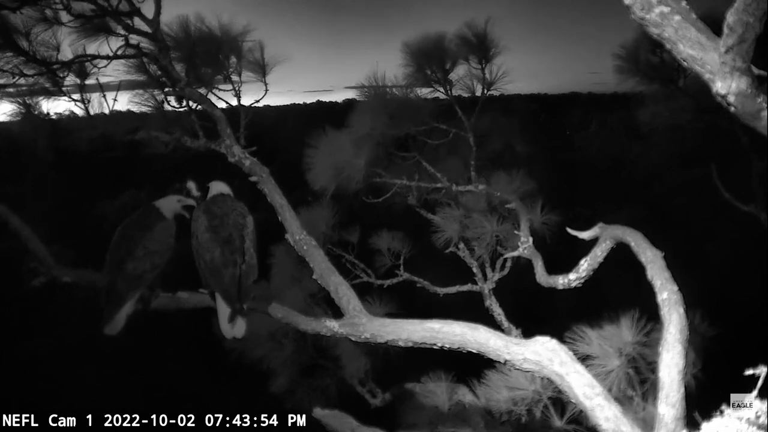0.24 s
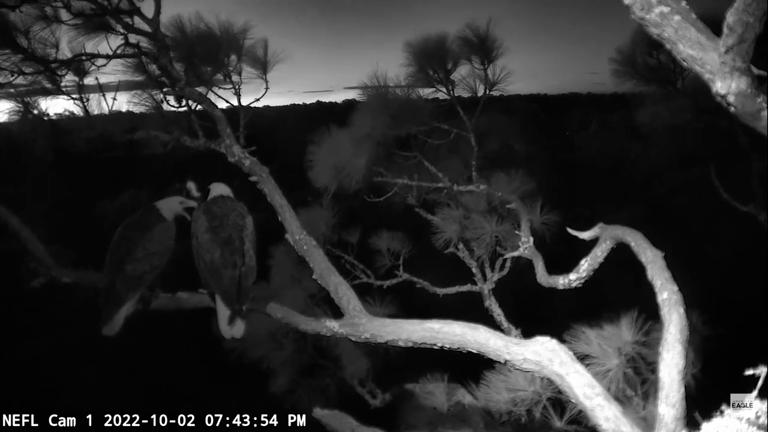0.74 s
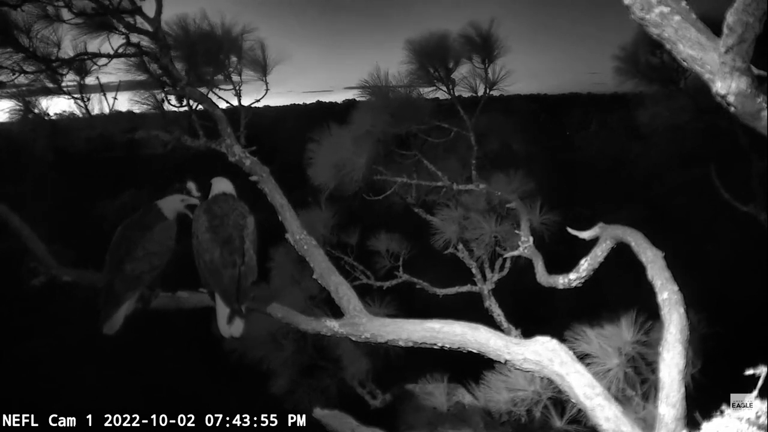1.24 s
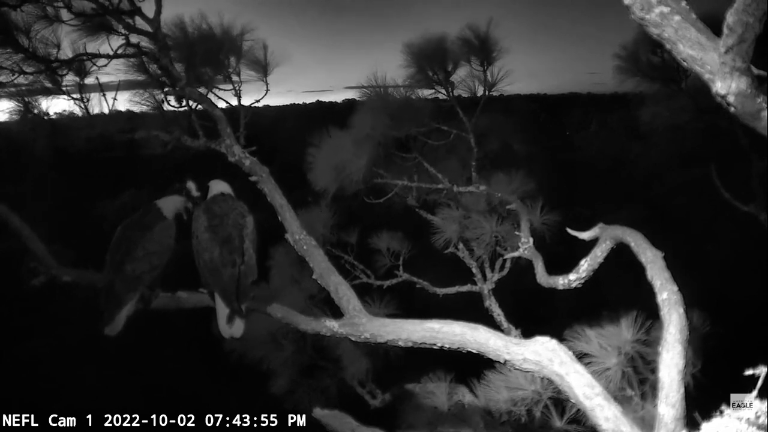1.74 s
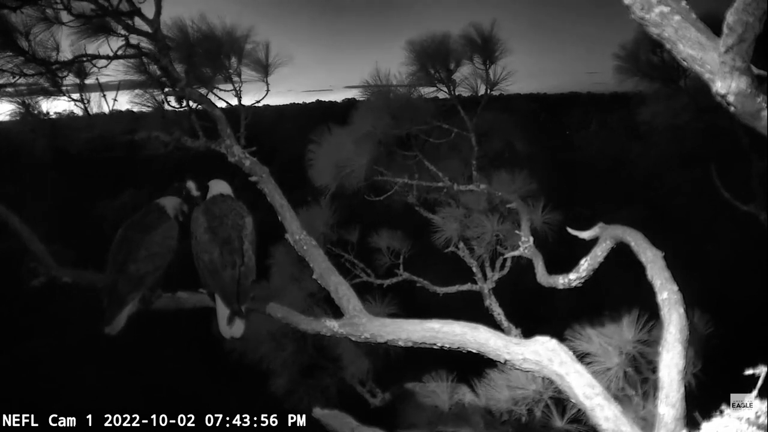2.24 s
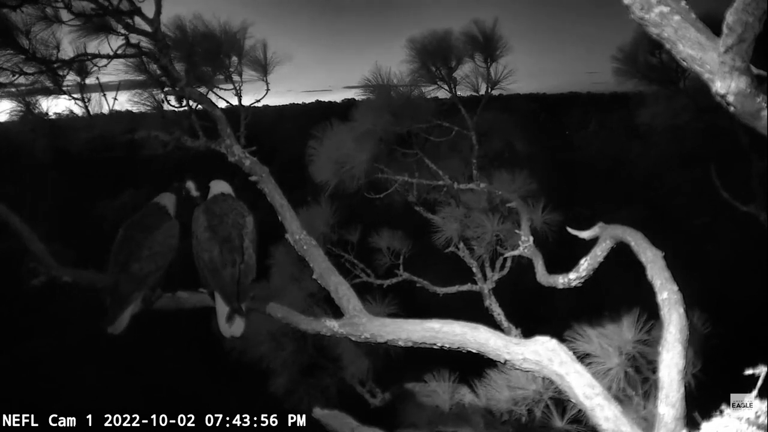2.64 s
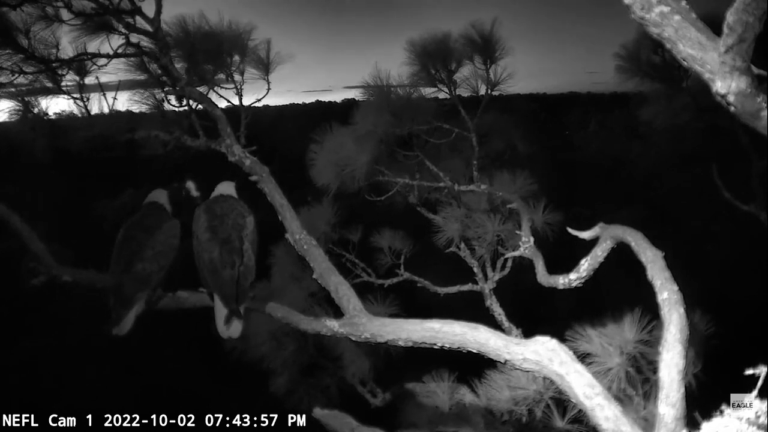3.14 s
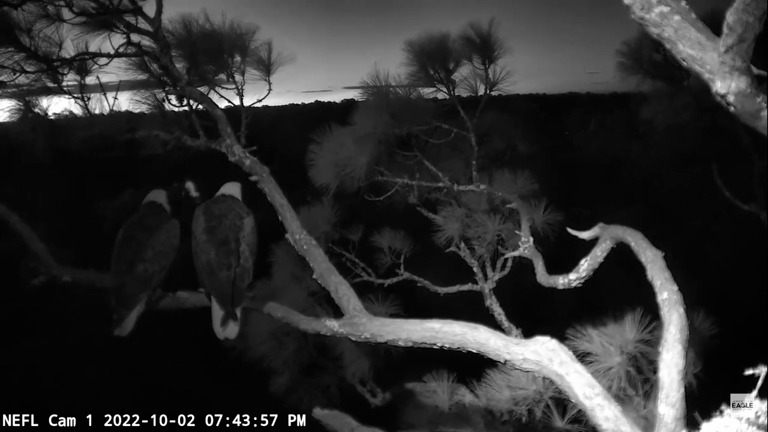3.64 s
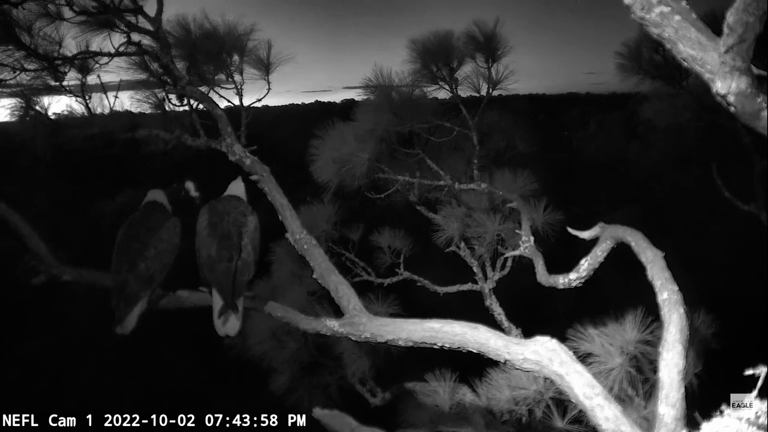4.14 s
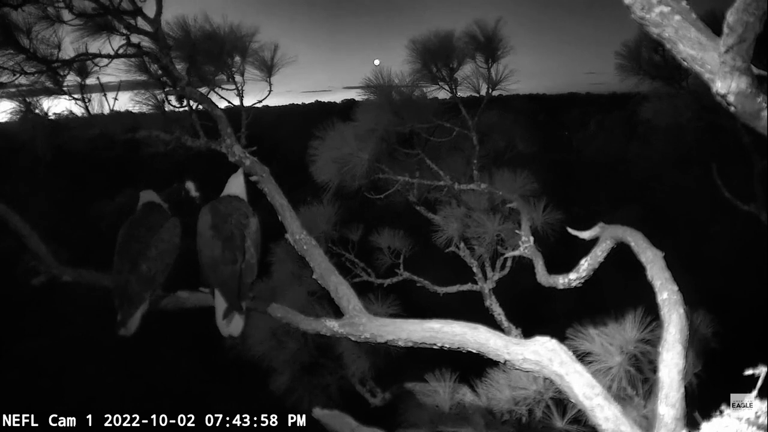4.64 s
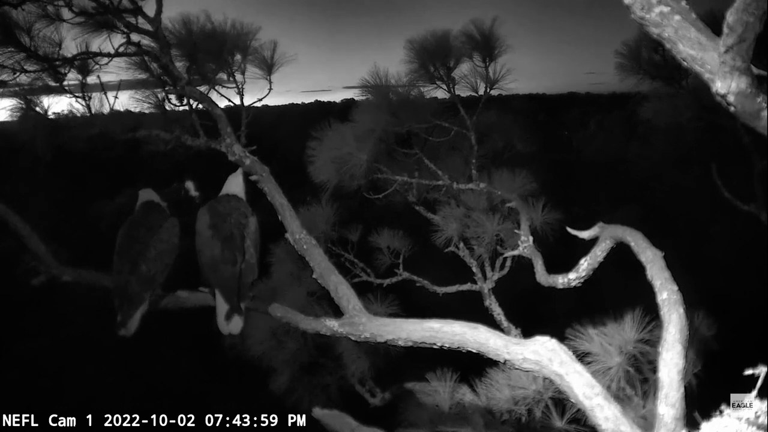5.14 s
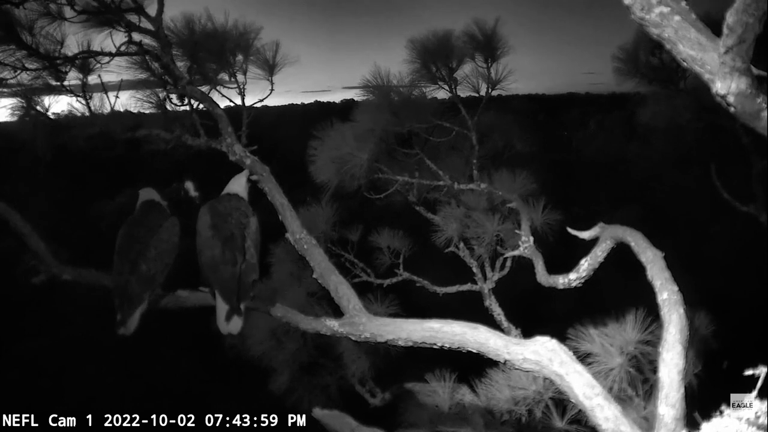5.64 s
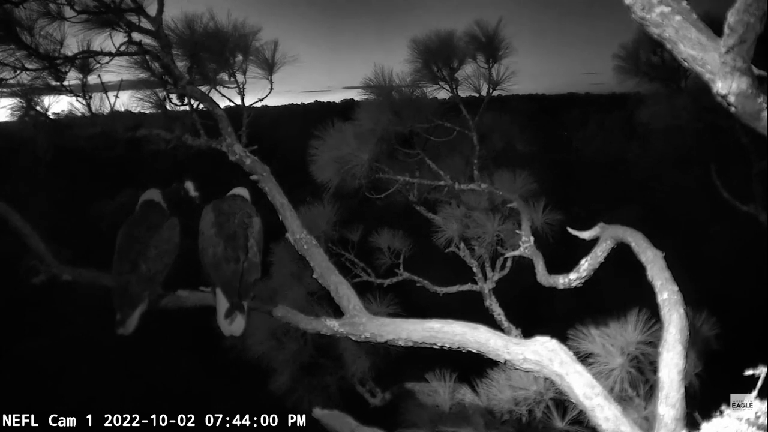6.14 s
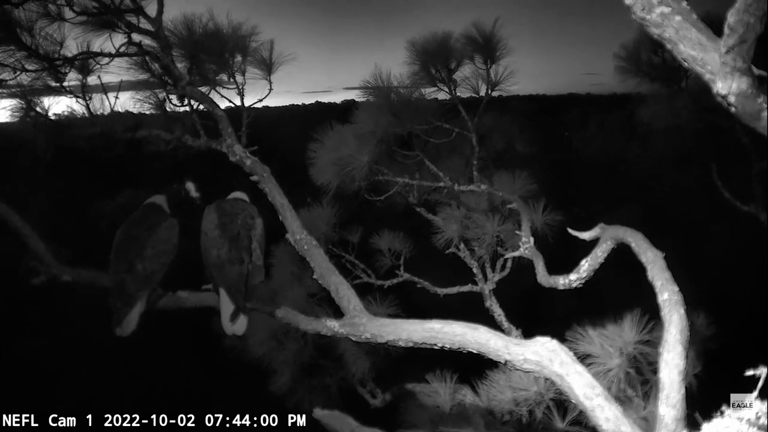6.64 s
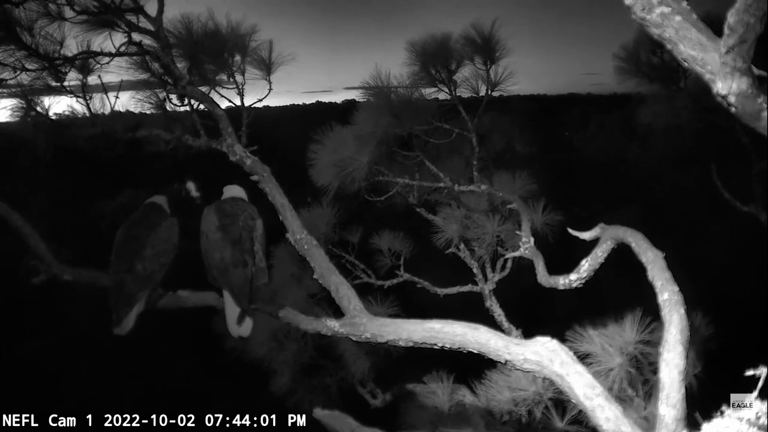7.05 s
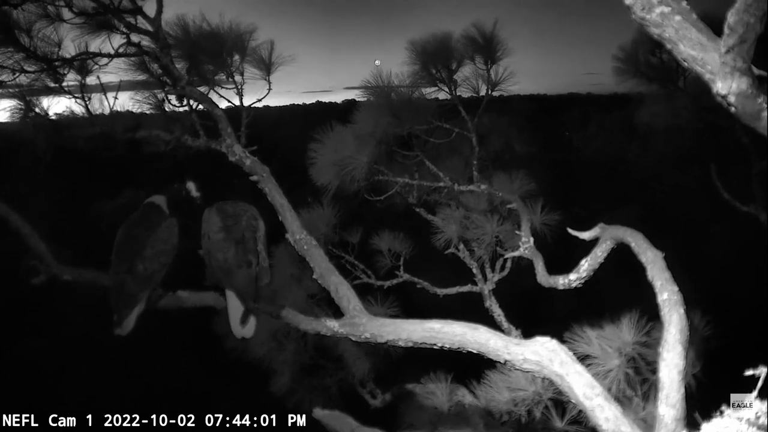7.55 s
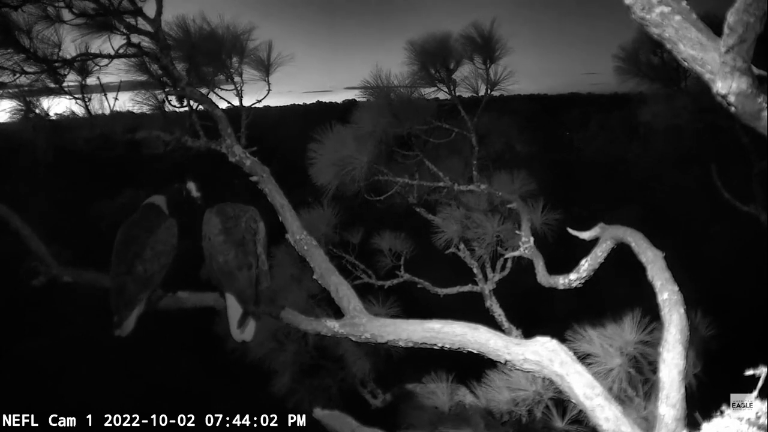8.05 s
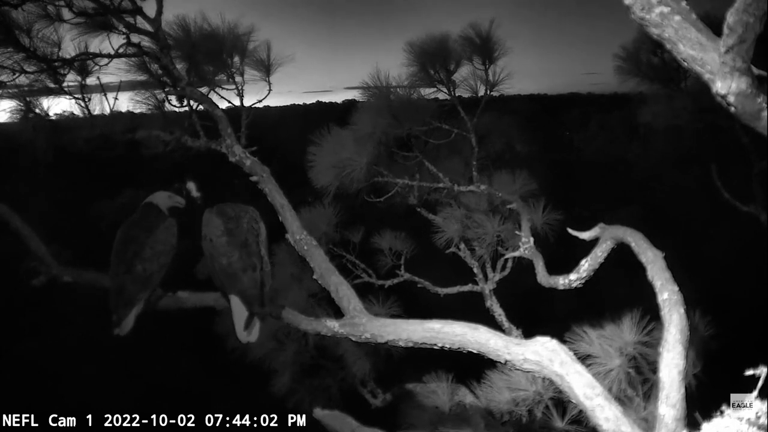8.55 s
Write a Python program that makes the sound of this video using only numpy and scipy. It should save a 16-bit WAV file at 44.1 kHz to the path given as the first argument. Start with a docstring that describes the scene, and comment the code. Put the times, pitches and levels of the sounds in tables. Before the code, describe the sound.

A high outdoor treetop at dusk, with soft hiss, a thin steady high whine, a faint far hum and low, lumpy wind buffeting the microphone. From 0 to 0.9 s two eagles give quick squeaky yelps, thin cries and piping chatter notes. A second bout at 1.3 to 2.2 s begins with bright cries and yelps, then descends into chatter with faint creaks. After a gap, a chatter run with one creak lasts from 2.8 to 3.3 s. From 4.2 s ragged cries, yelps, rattling creaks and a whoop overlap, echoing diffusely through the trees. Three loud, upward-sliding whoops land near 5.15, 5.45 and 5.75 s, with raspy creaks and a deep gust thump at 5.5. Wind eases around 6 s. Chatter and tiny rising wheezes return at 6.3 s, then softer, more distant-sounding yelps and cries until 7.5 s, leaving light wind, hiss and hum to about 8.8 s.

```python
"""Eagles call in a high tree over a far hum, soft hiss, thin whine and buffeting wind with flurries.
Two bouts open, of yelps, cries and chatter notes; at 2.8 s comes a run of chatter with one creak.
From 4.2 s cries, yelps, creaks and a whoop crowd together; three loud whoops follow, 5.1 to 5.8 s,
with creaks and a gust. The wind eases; chatter and wheezes return at 6.3 s, then yelps and cries.
Whistles are sine arches with overtones and rasp, creaks are resonated pulses, air sounds are shaped noise."""
import sys
import numpy as np
from scipy import signal
from scipy.fft import rfft, irfft, next_fast_len
from scipy.io import wavfile

SR = 44100
rng = np.random.default_rng(int(sys.argv[2]) if len(sys.argv) > 2 else 0)


def pcm_store(signal):
    """Save signal as 16-bit PCM."""
    levels = np.round(np.clip(np.atleast_2d(signal), -1, 1) * 32767)
    wavfile.write(sys.argv[1], SR, levels.astype(np.int16).T)


N = 387198
TIME_S = np.arange(N) / SR

# still air and microphone hiss, relative density: freq_hz, level_db_per_hz
AIR_SPECTRUM = [(50, 8.5), (400, -1.5), (800, 1), (1500, -1.5), (2200, -7.5), (4000, -13), (5200, -16),
                (5950, -5.5), (7000, -18.5), (10000, -22), (13500, -27.5), (14500, -43)]
# resonances of the far-off hum, relative gains: centre_hz, width_hz, gain_db
HUM_MODES = [(880, 230, -14), (1369, 140, -5), (1817, 96, -10.5)]
# hum strength: time_s, level_db
HUM_LEVEL = [(0, -53.5), (2.5, -60.5), (4, -59), (6.1, -59), (7.2, -58.5), (7.8, -51.5), (8.2, -58.5),
             (8.78, -54.5)]
WHINE_HZ = 12960

# base wind on the microphone: time_s, buffeting_db, turbulence_db (before the trim in wind())
BASE_WIND = [(0, -25.5, -31), (.7, -23.5, -32), (1.25, -20, -29), (1.4, -24.5, -33.5), (2.2, -24.5, -34),
             (2.45, -26.5, -49.5), (2.75, -31, -49), (3.28, -27, -47.5), (3.75, -23.5, -32),
             (4.2, -20, -32), (4.32, -25, -43.5), (4.7, -21, -40.5), (4.82, -32, -58), (5.7, -34, -74),
             (6.2, -40, -65), (6.5, -50.5, -58.5), (6.85, -34.5, -68.5), (7.25, -36, -55),
             (7.55, -27.5, -51.5), (7.9, -35, -58.5), (8.06, -29, -48.5), (8.78, -24.5, -43)]
# flurries on top of it: peak_s, buffeting_db, turbulence_db (before the same trim)
FLURRIES = [(.08, -17, -30), (.26, -19.5, -25), (.55, -21, -30), (1.75, -21.5, -29), (2.07, -20.5, -30),
            (3.37, -22, -35), (4.51, -20.5, -33.5), (5.16, -21.5, -43), (5.51, -21, -38), (5.94, -32, -60),
            (6.26, -31, -61), (7.01, -22, -35), (7.122, -23, -38.5), (7.39, -25, -48)]
FLURRY_S = 0.06  # from peak to 1/e amplitude
# deep buffeting, relative density: freq_hz, level_db_per_hz
BUFFET_SPECTRUM = [(5, -2), (20, 6.5), (45, -1), (80, -6), (130, -16.5), (250, -29.5), (600, -92)]
# finer turbulence, relative density: freq_hz, level_db_per_hz
TURBULENCE_SPECTRUM = [(30, -27.5), (80, -4), (130, 1.5), (200, -4.5), (300, -11), (500, -22), (800, -31),
                       (1500, -40), (4000, -78.5)]

# echoes off the nearest limbs: delay_s, gain_db
LIMB_ECHOES = [(.0062, -27.5), (0.0106, -14.5), (0.02, -18.5)]
# colour of the scattered sound, relative: freq_hz, gain_db
FOREST_COLOUR = [(300, -22.5), (1500, -5), (2600, 4), (3500, 1.5), (4400, 0), (7000, 2), (9000, -10.5),
                 (12000, -10.5)]
# extra forest send as a bird calls away from the microphone: time_s, gain_db
FACING_AWAY = [(0, -2), (2.2, 4), (3.5, 0.5), (4.18, 15), (4.45, 9.5), (4.6, 1.5), (6.74, -1.5),
               (6.82, 12.5), (7.5, 4)]

# rising wheezes between chatter notes: start_s, level_db
WHEEZES = [(6.355, -45.5), (6.463, -52)]

# rattles of one or more creaks: start_s, count, spacing_s, middle_level_db
RATTLES = [ (1.755, 2, 0.057, -37.5), (1.86, 1, .02, -38), (2.852, 1, .02, -37.5), (4.369, 7, .0194, -31.5),
           (4.506, 1, .02, -22.5), (4.581, 2, 0.049, -29), (4.732, 1, .02, -38), (4.846, 5, 0.023, -28),
           (5.209, 4, 0.018, -22), (5.494, 4, .0152, -22), (5.763, 3, .0185, -20), (6.418, 2, 0.018, -24.5),
           (6.522, 1, 0.022, -29), (7.155, 3, 0.15, -41)]
# colour of the creak pulses and the grunts, relative: freq_hz, gain_db
CREAK_COLOUR = [(150, -17.5), (430, 9.5), (620, -7.5), (850, 6), (1100, -8.5), (1500, 0), (2200, -10),
                (3100, -13.5), (4200, -25.5), (6000, -31), (10000, -37.5)]
CREAK_S, CREAK_DOUBLING_DB = 0.028, 20.5  # length at 0 dB; level rise that doubles it
RATTLE_SWELL_DB = 12  # a rattle is loudest in its middle

# overtones of a whistle: harmonic_number, level_db (before BEAK_RADIATION)
HARMONICS = [(2, -18.5), (3, -36), (4, -46.5), (5, -54)]
# how well overtones radiate: freq_hz, gain_db
BEAK_RADIATION = [(3600, -8.5), (4400, -13), (5200, 4), (6000, -11), (7100, -0.5), (8600, 3), (9600, -6.5),
                  (11000, -8.5), (14000, -15.5)]
# rasp noise, relative density: freq_hz, level_db_per_hz
RASP_SPECTRUM = [(200, -21), (600, -7.5), (1100, 0), (1700, 16.5), (3000, 10.5), (4500, -7), (6500, -12),
                 (9500, -27), (14000, -45.5)]

# faint low peeps: start_s, level_db, pitch_hz
PEEPS = [(0.106, -39.5, 1370), (0.36, -39.5, 1360), (1.396, -46, 1880), (3.342, -44.5, 1570)]
PEEP_S, PEEP_FALL, PEEP_ROUGH = 0.02, 0.22, 0.14  # FALL: share of pitch lost

# plain arched cries: start_s, length_s, level_db, pitch_hz, roughness_0_1
CRIES = [ (0.037, 0.039, -37, 3530, 0.78), (0.044, 0.035, -46, 4680, 0.6), (0.262, 0.0073, -23.5, 3400, 0),
         (.398, .014, -22, 3294, 0.3), (0.474, 0.012, -30, 3190, 0.3), (1.305, 0.0058, -26.5, 3360, .03),
         (1.315, 0.018, -19, 3486, 0.07), (1.326, 0.034, -14, 3393, .02), (1.955, 0.0087, -24, 2994, 0.6),
         (2.443, 0.041, -42, 3230, 0.4), (2.946, 0.028, -40, 2730, 0.4), (4.176, 0.087, -28, 3696, 0.08),
         (4.589, .05, -29.5, 3526, 0), (4.722, .056, -34, 3400, 0.52), (6.301, 0.019, -33.5, 2270, 0.37),
         (6.769, 0.03, -34.5, 3360, 0.37), (7.315, 0.036, -28.5, 3333, 0.27),
         (7.47, 0.038, -37, 3060, 0.83)]
ARCH_PER_S = 1.4  # a longer note bends further below its crest at both ends

# chatter notes: start_s, length_s, level_db, pitch_hz, roughness_0_1,
# catch_db (before the trim in catches()), rebound_db (relative to the note)
CHIPS = [ (.451, 0.013, -19.5, 2624, 0.07, -50, -20), (.503, 0.022, -26.5, 3190, 0.54, -46.5, -17),
         (0.537, 0.015, -24.5, 2580, 0.38, -43, -7), (.632, 0.013, -19, 2604, .09, -45, -15),
         (0.726, 0.022, -20, 2380, 0.21, -55.5, -18), (0.833, 0.015, -32.5, 2263, 0.4, -54, -13),
         (1.776, 0.022, -20.5, 2583, 0.07, -70, -19), (1.817, 0.011, -22, 3090, 0.4, -64, -20.5),
         (1.861, .013, -23.5, 2620, .25, -46, -5.5), (1.959, 0.012, -25, 2616, .3, -44, -2),
         (2.051, .035, -28.5, 2490, 0.36, -46.5, -10.5), (2.16, 0.024, -34.5, 2287, 0.43, -58, -7),
         (2.853, 0.018, -27, 2544, 0.24, -49.5, 2.5), (2.885, 0.037, -31.5, 2250, 0.42, -62.5, -20.5),
         (2.925, 0.031, -31.5, 3130, 0.53, -44.5, -4), (3.027, 0.025, -20.5, 2680, 0.22, -43, -27.5),
         (3.13, .017, -20.5, 2594, 0.14, -41, -3.5), (3.235, 0.018, -23.5, 2431, 0.1, -47, -10.5),
         (4.356, 0.0059, -27, 2580, 0, -68, -21), (4.405, 0.0045, -30.5, 3000, 0.6, -64, -0.5),
         (4.812, .02, -23, 3020, 0.32, -56.5, 2.5), (4.885, 0.038, -36, 2500, 0.3, -46, -9.5),
         (6.32, 0.023, -17.5, 2482, 0, -51, -4.5), (6.406, .019, -23, 3217, 0, -37, -13),
         (6.506, 0.027, -30, 3095, 0.46, -41, 0.5), (6.613, 0.022, -16.5, 2554, 0.02, -43, -14),
         (6.735, .025, -20.5, 2342, 0.08, -46, -25), (7.493, 0.015, -31, 2424, 0.04, -64, -17)]
CATCH_LEAD_S, REBOUND_S = 0.013, 0.017  # before and after the note's start
ROUGH_FALL = 0.44  # share of pitch lost at full roughness
SQUEAK_TOP_HZ = 7600

# whoops: start_s, crest_length_s, crest_level_db, crest_pitch_hz, roughness_0_1, slide_db, flip_db
WHOOPS = [(4.572, .033, -18.5, 2327, 0.22, -37.5, -41), (5.148, 0.029, -15, 2457, .01, -21.5, -27.5),
          (5.433, 0.02, -12, 2462, 0.03, -18, -26), (5.717, 0.021, -12.5, 2477, 0, -18.5, -45)]
# pitch at start, middle and end, over the crest pitch
SLIDE_RATIOS, CREST_RATIOS = (0.72, 0.845, 0.93), (0.93, 0.99, 1)
SLIDE_S, CREST_AT_S = 0.025, 0.0205
FLIP_AT_S, FLIP_S, FLIP_RATIO = 0.049, 0.019, 1.22

# yelps, dropping through two upper registers to a landing note: landing_s, length_s, level_db,
# pitch_hz, roughness_0_1, lead_in_s, middle_register_db, top_register_length_s, top_register_db
YELPS = [ (0.172, 0.014, -18.5, 3430, 0, .034, -23.5, 0.032, -31),
         (0.29, 0.015, -20, 3410, 0.16, .033, -28.5, 0.021, -36),
         (0.385, 0.0094, -14.5, 3340, 0.06, 0.011, -32.5, .01, -38),
         (1.46, 0.0088, -19, 3390, 0, 0.039, -23.5, 0.0073, -28.5),
         (1.547, 0.038, -16, 3436, 0.04, 0.0045, -37, 0.0048, -30.5),
         (1.674, 0.028, -17.5, 3272, 0.17, 0.016, -32.5, 0.006, -59),
         (4.335, .05, -39, 3690, 0.4, 0.019, -36.5, 0.029, -38),
         (4.446, 0.056, -33, 3570, 0.46, 0.015, -46, 0.016, -58),
         (6.821, 0.046, -30, 3673, 0.12, .023, -34.5, .012, -51),
         (6.934, .03, -32, 3700, 0.15, 0.036, -34.5, .037, -41.5),
         (7.036, 0.05, -27.5, 3598, 0.11, 0.016, -39, 0.0053, -59),
         (7.17, 0.044, -28, 3500, 0.16, .008, -43.5, 0.0075, -64)]
MIDDLE_RATIO, TOP_RATIO = 1.264, 1.542  # register pitch over the landing note
MIDDLE_ENTERS = 0.45  # share of the top register that has passed
MIDDLE_LINGERS = 0.45  # overlap, as a share of the landing note's length
LANDING_FALL_PER_S, MIDDLE_FALL = 2.6, 0.05  # share of pitch lost: per s of lead-in; fixed
UPPER_ROUGH = 0.098  # added roughness of the upper registers


def amp(db):
    """Decibels to gain."""
    return 10 ** (np.asarray(db) / 20)


def unit(x):
    """Scales to rms 1."""
    return x / np.sqrt(np.mean(x ** 2) + 1e-20)


def add(mix, start_s, sound):
    """Mixes a sound in at a start time."""
    part = mix[max(round(start_s * SR), 0):][:len(sound)]
    part += sound[:len(part)]


def progress(length_s):
    """Ramp from 0 towards 1 over a length."""
    return np.arange(int(length_s * SR)) / (length_s * SR)


def curve(points):
    """Joins (time_s, value) points by straight lines over the scene."""
    return np.interp(TIME_S, *np.transpose(points))


def read(points, hz):
    """Reads (freq_hz, value) points joined on a log-frequency axis."""
    freq_hz, value = np.transpose(points)
    return np.interp(np.log(hz + 1), np.log(freq_hz), value)


def colour(x, spectrum):
    """Filters by a (freq_hz, gain_db) spectrum."""
    size = next_fast_len(len(x), True)
    gain = amp(read(spectrum, np.fft.rfftfreq(size, 1 / SR)))
    return irfft(rfft(x, size) * gain, size)[:len(x)]


def noise(spectrum):
    """Steady noise of rms 1 with this spectrum."""
    return unit(colour(rng.standard_normal(N), spectrum))


def wander(rate_hz):
    """Random motion of rms 1, rolled off smoothly around the rate."""
    size = next_fast_len(N, True)
    bins_hz = np.fft.rfftfreq(size, 1 / SR)
    spectrum = rfft(rng.standard_normal(N), size) / (1 + (bins_hz / rate_hz) ** 2)
    return unit(irfft(spectrum, size)[:N])


def ring(x, modes):
    """Passes x through parallel resonances."""
    return sum(amp(db) * signal.lfilter(*signal.iirpeak(hz, hz / width_hz, SR), x)
               for hz, width_hz, db in modes)


def resonate(x, hz, width_hz):
    """A resonance that follows the curve hz: shift to 0 Hz, low-pass, shift back."""
    turn = np.exp(2j * np.pi * np.cumsum(hz) / SR)
    r = np.exp(-np.pi * width_hz / SR)
    return 2 * (turn * signal.lfilter([1 - r], [1, -r], x / turn)).real


def swell(u, skew, fullness):
    """Loudness over a sound, u from 0 to 1; skew below 1 peaks early, above 1 late."""
    return np.abs(np.sin(np.pi * u ** skew)) ** fullness


def background(air_db=-55, whine_db=-81):
    """Soft hiss, a resonated-noise hum like far traffic, and the microphone's thin sine whine."""
    source = noise([(300, -12.0), (800, 6), (1700, 4), (2600, -24.5)])
    hum = unit(ring(source, HUM_MODES)) * amp(curve(HUM_LEVEL))
    whine = amp(whine_db) * unit(np.sin(2 * np.pi * WHINE_HZ * TIME_S))
    return amp(air_db) * noise(AIR_SPECTRUM) + hum + whine


def blowing(column):
    """Strength of buffeting (column 1) or turbulence (column 2): base and flurries add in power."""
    times_s, *levels_db = np.transpose(BASE_WIND)
    base = amp(np.interp(TIME_S, times_s, levels_db[column - 1]))
    flurry_power = sum((amp(row[column]) * np.exp(-((TIME_S - row[0]) / FLURRY_S) ** 2)) ** 2
                       for row in FLURRIES)
    return np.sqrt(base ** 2 + flurry_power)


def wind(turbulence_trim_db=1, lumps_db=2.0):
    """Deep buffeting and finer turbulence, both arriving in the same random lumps."""
    lumps = unit(amp(lumps_db * wander(42)))
    deep = blowing(1) * noise(BUFFET_SPECTRUM)
    fine = amp(turbulence_trim_db) * blowing(2) * noise(TURBULENCE_SPECTRUM)
    return lumps * (deep + fine)


def gust(peak_s=5.509, width_s=0.018, db=-11):
    """One blow of air pushes the diaphragm far out: a single negative bump."""
    return -amp(db) * np.exp(-((TIME_S - peak_s) / width_s) ** 2)


def scatter(t60_s, rise_s):
    """A diffuse echo of energy 1 that builds up and dies away."""
    t = TIME_S[:2 * SR]
    envelope = (1 - np.exp(-t / rise_s)) * np.exp(-np.log(1000) * t / t60_s)
    tail = colour(rng.standard_normal(len(t)), FOREST_COLOUR) * envelope
    return tail / np.linalg.norm(tail)


def treetop(x, crown_db=-21, crown_t60_s=0.06, forest_db=-26.5, forest_t60_s=1.05, stir_hz=55):
    """Direct sound, echoes off limbs, a short wash from the crown and a long one from the forest."""
    limbs = sum(amp(db) * np.interp(TIME_S - delay_s, TIME_S, x, left=0)
                for delay_s, db in LIMB_ECHOES)
    crown = amp(crown_db) * signal.fftconvolve(x, scatter(crown_t60_s, rise_s=0.019))[:N]
    outward = x * amp(forest_db + curve(FACING_AWAY))
    # flickering paths blur a whistle's tail into a soft band
    paths = [wander(stir_hz) * signal.fftconvolve(outward, scatter(forest_t60_s, rise_s=0.085))[:N]
             for _ in range(3)]
    return x + limbs + crown + sum(paths) / np.sqrt(len(paths))


def wheezes(length_s=0.04, from_hz=5400, to_hz=7400, width_hz=1100):
    """Air hisses through a bird's narrowing throat, whose resonance rises."""
    u = progress(length_s)
    hz = from_hz + (to_hz - from_hz) * u
    out = np.zeros(N)
    for start_s, db in WHEEZES:
        hiss = resonate(resonate(rng.standard_normal(len(u)), hz, width_hz), hz, width_hz)
        add(out, start_s, amp(db) * unit(hiss) * swell(u, skew=0.55, fullness=0.9))
    return out


def rattle(start_s, count, spacing_s, db):
    """Evenly spaced creaks that swell and fade, the louder longer: (start_s, length_s, level_db)."""
    levels_db = [db - RATTLE_SWELL_DB * ((2 * k + 1) / count - 1) ** 2 for k in range(count)]
    return [(start_s + k * spacing_s, CREAK_S * 2 ** (level / CREAK_DOUBLING_DB), level)
            for k, level in enumerate(levels_db)]


def creaks(pulse_hz=560, unevenness=0.23, scrape=0.29, from_hz=1750, to_hz=1330, width_hz=420):
    """Short runs of uneven voice pulses; the throat resonance sinks through each creak."""
    turns = np.cumsum(pulse_hz * np.exp(unevenness * wander(296.8))) / SR
    clicks = unit(np.diff(np.floor(turns), prepend=0))  # one per turn
    pulses = colour(clicks + scrape * rng.standard_normal(N), CREAK_COLOUR)
    out = np.zeros(N)
    for row in RATTLES:
        for start_s, length_s, db in rattle(*row):
            u = progress(length_s)
            source = pulses[round(start_s * SR):][:len(u)]
            voice = unit(resonate(source, from_hz + (to_hz - from_hz) * u, width_hz))
            add(out, start_s, amp(db) * swell(u, skew=0.95, fullness=0.87) * voice)
    return out


def catches(length_s=0.02, from_hz=6300, to_hz=3500, width_hz=1300, grunt_db=2, trim_db=-2):
    """The voice catches before a chatter note: noise in a falling resonance over a low grunt."""
    u = progress(length_s)
    hz = from_hz * (to_hz / from_hz) ** u
    grunt = unit(colour(noise([(400, -14.5), (2000, 5.5), (4000, -5.5)]), CREAK_COLOUR))
    out = np.zeros(N)
    for note_s, *_, db, _ in CHIPS:
        start_s = note_s - CATCH_LEAD_S
        squeak = unit(resonate(resonate(rng.standard_normal(len(u)), hz, width_hz), hz, width_hz))
        high = squeak * swell(u, skew=0.94, fullness=1.0)
        low = amp(grunt_db) * grunt[round(start_s * SR):][:len(u)] * swell(u, skew=0.31, fullness=1.2)
        add(out, start_s, amp(db + trim_db) * (high + low))
    return signal.sosfilt(signal.butter(6, SQUEAK_TOP_HZ, fs=SR, output="sos"), out)


def arch(start_s, length_s, db, hz, rough, fall):
    """A syllable whose pitch bends about its crest and loses the share fall on the way."""
    ends = 1 - ARCH_PER_S * length_s
    return start_s, length_s, db, hz * (ends + fall / 2), hz, hz * (ends - fall / 2), rough


def chip(start_s, length_s, db, hz, rough, catch_db, rebound_db):
    """A short note and its rebound on the same pitch; a ragged note sags."""
    fall = ROUGH_FALL * rough ** 2
    return [arch(start_s, length_s, db, hz, rough, fall),
            arch(start_s + REBOUND_S, length_s, db + rebound_db, hz, rough, fall)]


def whoop(start_s, length_s, db, hz, rough, slide_db, flip_db, slide_rough=0.02, flip_rough=0.29):
    """An upward slide, a louder crest, then a brief flip to a higher register."""
    return [(start_s, SLIDE_S, slide_db, *(hz * np.array(SLIDE_RATIOS)), rough + slide_rough),
            (start_s + CREST_AT_S, length_s, db, *(hz * np.array(CREST_RATIOS)), rough),
            arch(start_s + FLIP_AT_S, FLIP_S, flip_db, hz * FLIP_RATIO, flip_rough, 0)]


def yelp(landing_s, length_s, db, hz, rough, lead_s, middle_db, top_s, top_db):
    """The voice starts in its top register and breaks downward twice; the registers overlap."""
    top_at_s = landing_s - lead_s
    middle_at_s = top_at_s + top_s * MIDDLE_ENTERS
    middle_s = abs(landing_s - middle_at_s) + length_s * MIDDLE_LINGERS
    upper_rough = rough + UPPER_ROUGH
    return [arch(top_at_s, top_s, top_db, hz * TOP_RATIO, upper_rough, 0),
            arch(middle_at_s, middle_s, middle_db, hz * MIDDLE_RATIO, upper_rough, MIDDLE_FALL),
            arch(landing_s, length_s, db, hz, rough, LANDING_FALL_PER_S * lead_s)]


def syllables():
    """All whistles: (start_s, length_s, level_db, start_hz, middle_hz, end_hz, roughness)."""
    calls = [yelp(*row) for row in YELPS]
    calls += [chip(*row) for row in CHIPS]
    calls += [whoop(*row) for row in WHOOPS]
    cries = [arch(*row, 0) for row in CRIES]
    peeps = [arch(start_s, PEEP_S, db, hz, PEEP_ROUGH, PEEP_FALL) for start_s, db, hz in PEEPS]
    return sum(calls, []) + cries + peeps


def whistles(jitter=0.067, waver=0.0099, flutter_db=2.54, rough_flutter_db=5, shimmer=0.15,
             rasp_db=-8, overtone_lag=1.4):
    """Each syllable is a pitch arch; roughness shakes its pitch and strength and adds a rasp."""
    shake, drift, flutter, tremble = wander(330), wander(85), wander(130), wander(650)
    rasp = noise(RASP_SPECTRUM)
    out = np.zeros(N)
    for start_s, length_s, db, start_hz, middle_hz, end_hz, rough in syllables():
        u = progress(length_s)
        now = round(start_s * SR) + np.arange(len(u))
        hz = np.polyval(np.polyfit([0, 0.5, 1], [start_hz, middle_hz, end_hz], 2), u)
        hz = hz * (1 + waver * drift[now] + jitter * rough * shake[now])
        phase = 2 * np.pi * np.cumsum(hz) / SR
        overtones = sum(amp(level_db + read(BEAK_RADIATION, k * hz)) * np.sin(k * phase)
                        for k, level_db in HARMONICS if k * middle_hz < SR / 2)
        body = swell(u, skew=0.83, fullness=0.69)
        bloom = swell(u, skew=overtone_lag, fullness=0.83)  # overtones peak after the fundamental
        tone = np.sqrt(2) * (body * np.sin(phase) + bloom * overtones)
        fluttering = amp((flutter_db + rough_flutter_db * rough) * flutter[now])
        strength = unit(fluttering * (1 + shimmer * rough * tremble[now]))
        rasping = amp(rasp_db) * abs(rough) ** 0.79 * body * rasp[now]
        add(out, start_s, amp(db) * (strength * tone + rasping))
    return out


def scene():
    """The eagles in their tree, with wind and background."""
    eagles = whistles() + catches() + wheezes() + creaks()
    return (treetop(eagles) + wind() + gust() + background())[None]


def record(dry, ceiling=0.39, edge_hz=15050):
    """The loudest peaks overload the input; a steep low-pass limits the band."""
    clipped = dry / (1 + np.abs(dry / ceiling) ** 20) ** (1 / 20)
    low_pass = signal.firwin(511, edge_hz, window=("kaiser", 9), fs=SR)
    return signal.oaconvolve(clipped, low_pass[None], "same")


dry = scene()
out = record(dry)
pcm_store(out)
```